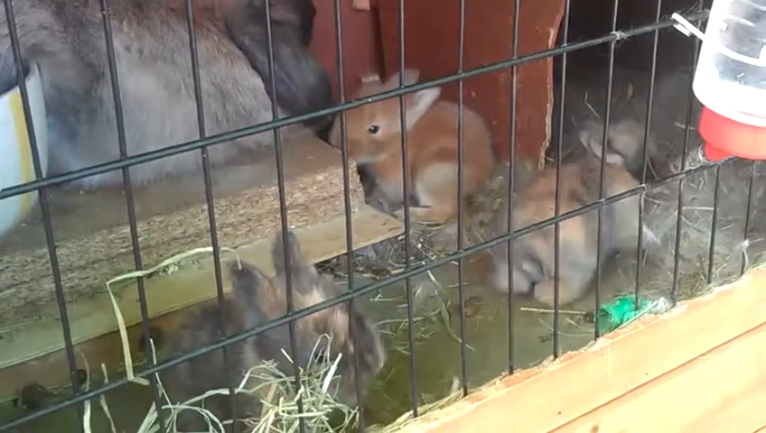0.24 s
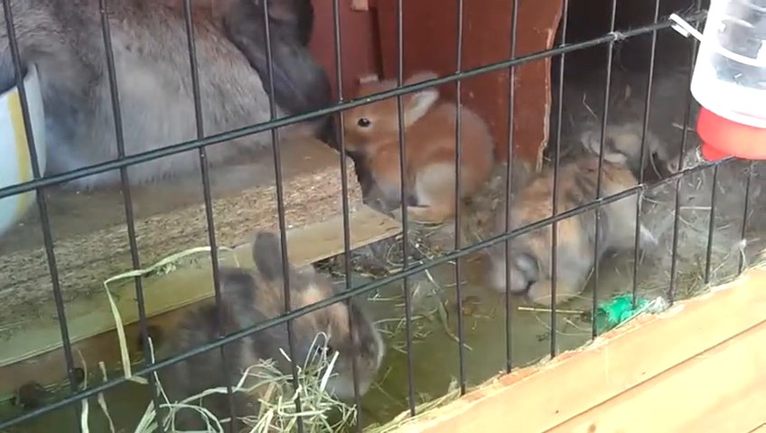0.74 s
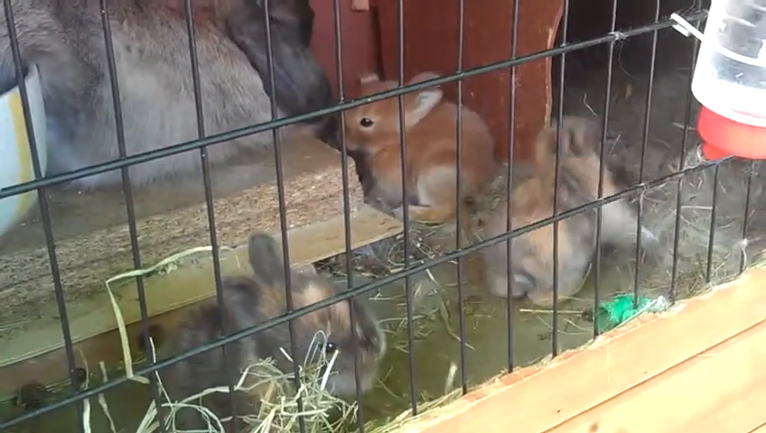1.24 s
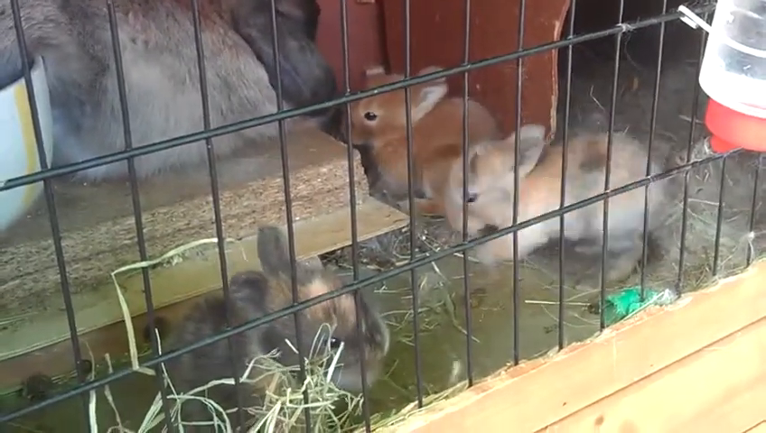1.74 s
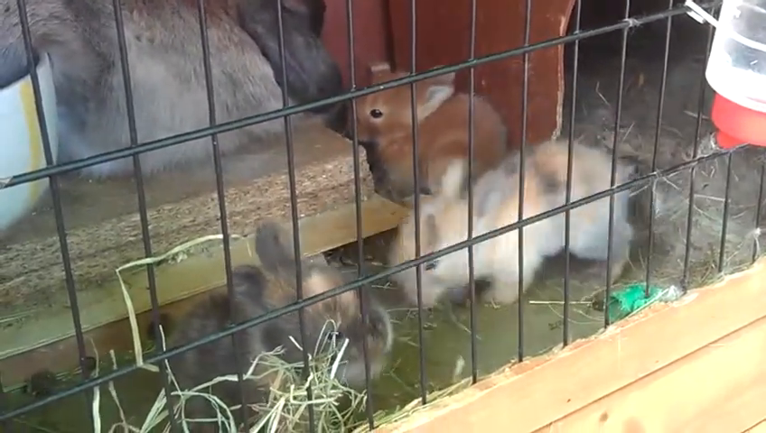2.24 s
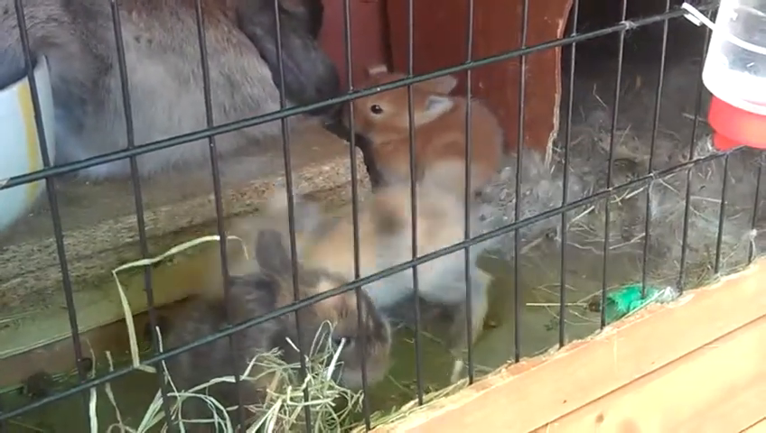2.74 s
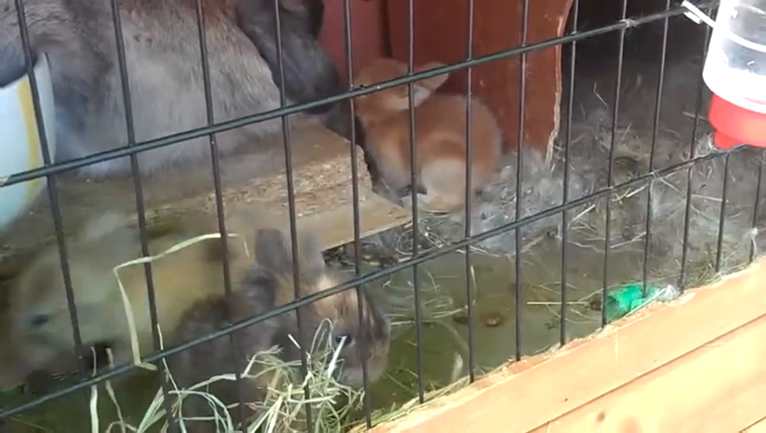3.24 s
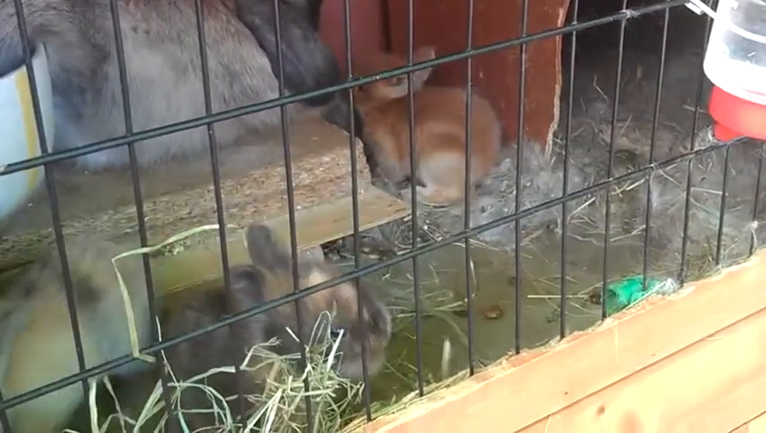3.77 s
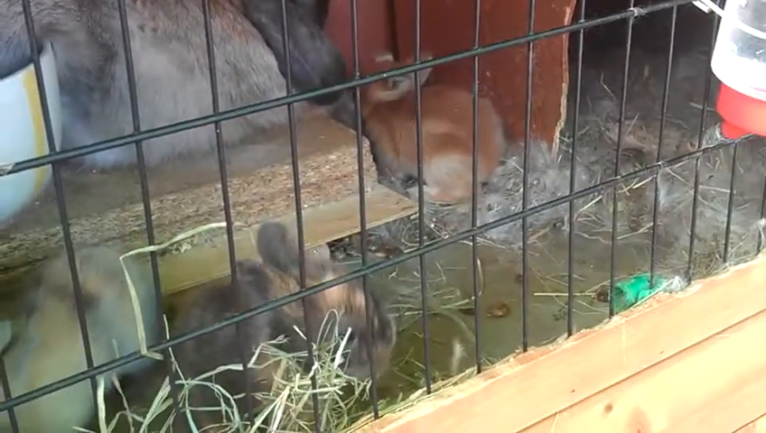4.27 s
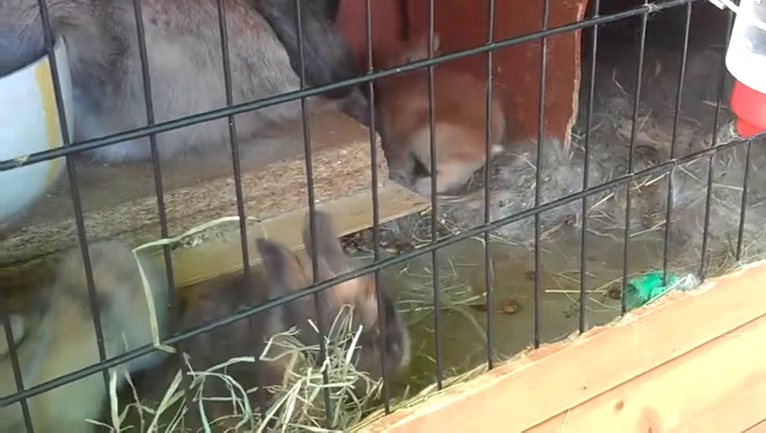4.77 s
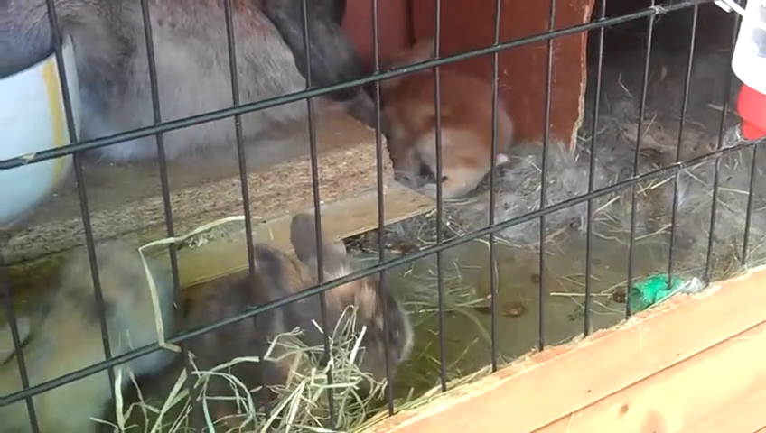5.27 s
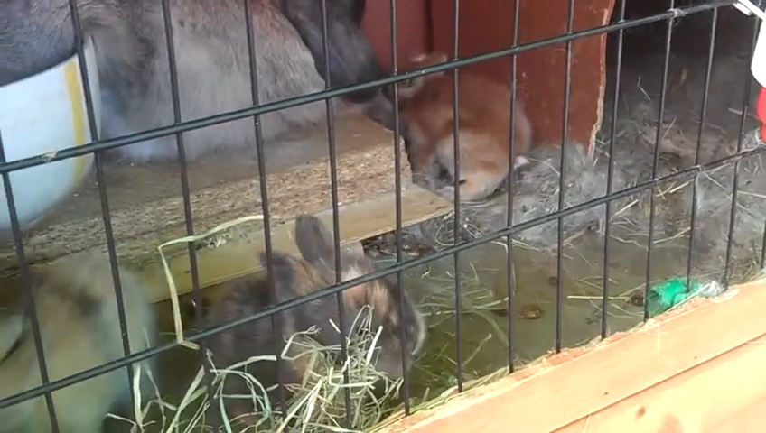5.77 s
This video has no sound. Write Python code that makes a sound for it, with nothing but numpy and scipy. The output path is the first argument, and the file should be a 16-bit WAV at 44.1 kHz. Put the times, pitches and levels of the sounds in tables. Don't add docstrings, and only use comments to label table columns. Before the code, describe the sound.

Young rabbits rustle and hop in dry hay, stems snapping, while distant sparrows chatter; near the end three loud plastic snaps crack out.

```python
import sys
import numpy as np
from scipy import signal
from scipy.fft import rfft, irfft, next_fast_len
from scipy.io import wavfile
from scipy.ndimage import uniform_filter1d

SR = 44100
rng = np.random.default_rng(int(sys.argv[2]) if len(sys.argv) > 2 else 0)


def materialize(psi):
    bounded = np.clip(np.atleast_2d(psi).T, -1, 1)
    quanta = np.round(bounded * 32767).astype(np.int16)
    wavfile.write(sys.argv[1], SR, quanta)


def makeup_ratio(level_db):
    decades = np.asarray(level_db, float) / 20
    return 10 ** decades


N = 264908

# frequency in Hz, level in dB.
CRACKLE_TONE = [(2000, -19.5), (3600, 1), (6300, -7.5), (8500, -7.5), (10500, -1), (13800, -8.5)]
# frequency in Hz, level in dB.
SCUFF_TONE = [(150, -47), (500, -12), (1200, -6), (2300, 1), (3600, 3), (5000, -8), (6500, -37)]


def evened(x):
    return x / np.sqrt(np.mean(x ** 2) + 1e-20)


def read(points, hz):
    f, value = np.transpose(points)
    return np.interp(np.log(hz + 1), np.log(f + 1), value)


def add(mix, s, sound):
    part = mix[..., round(s * SR):][..., :sound.shape[-1]]
    part += sound[..., :part.shape[-1]]


def coloured(x, points):
    size = next_fast_len(x.shape[-1])
    gain = makeup_ratio(read(points, np.fft.rfftfreq(size, 1 / SR)))
    return irfft(rfft(x, size) * gain, size)[..., :x.shape[-1]]


def highpassed(x, order, hz):
    return signal.sosfilt(signal.butter(order, hz, "high", fs=SR, output="sos"), x)


def scattered(x, t60, size, count):
    t = np.arange(size) / SR
    turn = np.arange(N) / SR * 12
    tails = rng.standard_normal((count, 2, size)) * makeup_ratio(-60 * t / t60)
    tails /= np.linalg.norm(tails, axis=2, keepdims=True)
    out = np.zeros((2, N))
    for k, tail in enumerate(tails):
        near = np.clip(1 - abs((turn - k) % count - 1), 0, 1)
        faded = x * np.sin(np.pi / 2 * near)
        out += signal.oaconvolve(faded[None], tail, axes=1)[:, :N]
    return out


def swarm(level, per_s, spread_db, t60):
    size_db = spread_db * np.minimum(rng.exponential(1, N), 4)
    power = makeup_ratio(2 * size_db) * (rng.random(N) < per_s / SR)
    puff = makeup_ratio(-120 * np.arange(1500) / SR / t60)
    shape = signal.oaconvolve(level ** 2 * power / power.mean(), puff / puff.sum())[:N]
    return np.sqrt(abs(shape)) * rng.standard_normal((2, N))


def swells(times, dbs, lengths, rise, drop_db, rest_db):
    t = np.arange(0, N + 64, 64) / SR
    u = (t - np.array(times)[:, None]) / np.maximum(lengths, .005)[:, None]
    fall_db = drop_db * np.where(u < 0, -u / rise, u)
    power = makeup_ratio(2 * (np.array(dbs)[:, None] - fall_db)).sum(0)
    return np.sqrt(np.interp(np.arange(N) / SR, t, power) + makeup_ratio(2 * rest_db))


def yard():
    # frequency in Hz, level in dB per Hz.
    yard_tone = [(24, -45), (40, -26), (75, -36.5), (169, -3), (221, 2), (617, -6.5), (807, -2),
                 (2480, -11.5), (3580, -3.5), (4920, -12.5), (7090, -20), (7820, -20), (11000, -16.5),
                 (13700, -17)]
    # frequency in Hz, left-right likeness (1 same, -1 opposite).
    likeness = [(60, -0.88), (150, 1), (360, 0.21), (890, -0.42), (2190, 0.57), (5390, 0.19), (13300, 0.23)]
    frames, hz = N // 256 + 5, np.fft.rfftfreq(1024, 1 / SR)
    a, b, c, d, patches = rng.standard_normal((frames, 513, 5)).T
    patches = uniform_filter1d(patches, 12, 0)
    patches = evened(uniform_filter1d(patches, 14, 1))
    same = np.clip(read(likeness, hz), -1, 1)[:, None]
    left, other = a + 1j * b, c + 1j * d
    z = np.array([left, same * left + np.sqrt(1 - same ** 2) * other])
    z *= makeup_ratio(read(yard_tone, hz)[:, None] + 0.91 * patches)
    noise = signal.istft(z, nperseg=1024, noverlap=768)[1][:, :N]
    return makeup_ratio(-46.5) * evened(noise)


def chatter(first_hz, last_hz, count):
    flock, u = np.zeros(N), np.linspace(0, 1, 3000)
    for when, a, b, rate in rng.random((count, 4)):
        start_hz = first_hz * (.85 + .4 * a ** 1.5)
        end_hz = last_hz * (.87 + .26 * b)
        warble = 1 + 0.048 * np.sin(2 * np.pi * (3.456 + 4.41 * rate) * u)
        hz = (start_hz * (1 - u) + end_hz * u) * warble
        add(flock, when * N / SR, np.sin(2 * np.pi * np.cumsum(hz) / SR) * np.sin(np.pi * u))
    blurred = scattered(flock, 0.45, size=9000, count=6)
    blurred[:, :4000] += blurred[:, -4000:] * np.linspace(1, 0, 4000)
    return blurred / np.sqrt(uniform_filter1d((blurred ** 2).mean(0), 3000))


def sparrows():
    # loudest moment in seconds, low chatter in dB, high opening in dB, length in seconds.
    bouts = [(.01, -47, -66.5, 0.16), (0.145, -41.5, -54, 0.27), (0.572, -46, -73, 0.21),
             (0.755, -48.5, -56, 0.16), (1.19, -43.5, -48.5, 0.21), (1.413, -47.5, -64, 0.22),
             (1.69, -41.5, -53, 0.3), (2.1, -47.5, -55, 0.45), (2.32, -38.5, -50, 0.14),
             (2.553, -43.5, -60, .12), (2.964, -40.5, -46, 0.17), (3.16, -47, -53, 0.23),
             (3.92, -43.5, -50, 0.18), (3.682, -43.5, -63, 0.17), (4.054, -36, -61, .2),
             (4.192, -53, -54, .2), (4.756, -38.5, -46, 0.26), (5.404, -48, -49.5, 0.11),
             (5.55, -43, -60, .2), (6.0, -41.5, -50.5, 0.3)]
    s, low_db, high_db, length = np.transpose(bouts)
    drop_db = 14.5
    low = swells(s, low_db, length, rise=0.59, drop_db=drop_db, rest_db=-80)
    high = swells(s - 0.33 * length, high_db, 0.88 * length, rise=0.3, drop_db=drop_db, rest_db=-67.5)
    low_birds = makeup_ratio(-0.5) * low * chatter(4050, 3200, count=300)
    return low_birds + makeup_ratio(0.5) * high * chatter(5500, 4500, count=200)


def hay():
    # loudest moment in seconds, stem crackle in dB, paw scuff in dB, length in seconds.
    shuffles = [(0.0, -63, -47.5, 0.028), (0.178, -58, -54, .15), (1.297, -57, -67, .04),
                (1.456, -46, -34.5, 0.035), (1.523, -53, -53, 0.1), (1.66, -52, -48, .08),
                (2.096, -50, -55, 0.023), (2.157, -73, -45.5, .06), (2.333, -50.5, -39, 0.06),
                (2.416, -66, -51, .06), (2.46, -57, -42.5, 0.048), (2.551, -35, -39.5, 0.058),
                (2.617, -57, -47, 0.087), (2.887, -48.5, -44.5, 0.085), (2.936, -48, -42.5, .04),
                (3.075, -62, -40.5, 0.03), (3.39, -50, -66, 0.045), (3.565, -52, -51, 0.053),
                (3.858, -55, -55, .05), (4.13, -58, -50.5, 0.056), (4.632, -66, -51.5, 0.079),
                (5.197, -63, -58, 0.071), (5.31, -56, -65, 0.044), (5.524, -59, -53, 0.06),
                (5.734, -59, -55, 0.054), (5.78, -67, -48, 0.13), (5.993, -53, -44, 0.13)]
    # time in seconds, level in dB.
    nibbling = [(0, -58), (.3, -73), (1.0, -71), (1.4, -60.5), (3.0, -60.5), (3.7, -57.5), (4.6, -59),
                (5.1, -60), (6.0, -59.5)]
    s, crackle_db, scuff_db, length = np.transpose(shuffles)
    nibble_db = np.interp(np.arange(N) / SR, *np.transpose(nibbling))
    rise, drop_db = 0.73, 16
    crackle = swells(s, crackle_db, length, rise, drop_db, nibble_db)
    scuff = swells(s, scuff_db, length, rise, drop_db, nibble_db + 1.5)
    crackle = swarm(crackle, per_s=1000, spread_db=3.6, t60=.016)
    scuff = swarm(scuff, per_s=450, spread_db=3.8, t60=.016)
    return makeup_ratio(11.0) * coloured(crackle, CRACKLE_TONE) + makeup_ratio(9.5) * coloured(scuff, SCUFF_TONE)


def stems():
    # start in seconds, peak in dB, dull body against the crack in dB, length in seconds.
    breaks = [(0.0612, -35, -19, 0.0066), (0.576, -34.5, -18, 0.0038), (1.287, -36, -18, 0.006),
              (1.3692, -33, -10, 0.006), (1.4516, -29.5, -3.5, 0.01), (1.4604, -31.5, 1, 0.0093),
              (1.5268, -41, -11, 0.006), (1.6131, -36, -16, 0.0072), (2.092, -42.5, 5, 0.0078),
              (2.2941, -35, 8, 0.0048), (2.412, -43, -2, 0.0067), (2.449, -33, -8, 0.006),
              (2.5201, -30, -10, 0.01), (2.545, -25.5, -28, 0.0091), (2.6977, -35.5, -20, 0.006),
              (2.8638, -38, -11, 0.0074), (2.942, -36, -3, 0.0066), (3.1725, -40, 0.5, 0.0064),
              (3.264, -36.5, -14, 0.006), (3.3906, -34, -8, 0.0056), (3.4175, -36, -19, 0.006),
              (3.56, -37, -0.5, 0.0074), (3.714, -38, -1.5, 0.0064), (3.8716, -24.5, -15, 0.0042),
              (4.598, -56, -4, 0.006), (5.9872, -39, 2, 0.006)]
    sharp_cracks = [
        (2.2958, -34, 2, .002),
        (3.873, -26, -5, 0.0019),
        (5.8777, -26.5, -14, 0.016),
    ]
    # start in seconds, peak in dB, length in seconds.
    strokes = [(2.142, -31.5, 0.004), (2.316, -31, 0.0044), (2.34, -31, 0.004), (2.35, -35, 0.004),
               (2.39, -30, 0.0038), (2.4199, -34, 0.0048), (2.473, -38, 0.004), (2.579, -30, 0.006),
               (2.629, -36, 0.0046), (2.87, -40, 0.004), (2.919, -33, 0.0061), (2.973, -42, 0.0037),
               (3.067, -33, 0.004), (4.603, -32, 0.0028), (5.741, -37, 0.004), (5.766, -40, 0.004)]
    rows = [*breaks, *sharp_cracks]
    rows += [(s, db - 40, 37.5, length) for s, db, length in strokes]
    crack, body, t = np.zeros((2, N)), np.zeros((2, N)), np.arange(1500) / SR
    for s, db, body_db, length in rows:
        bright, dull = rng.standard_normal((2, 2, 1500))
        rise = 1 - np.exp(-t / .0004)
        shape = makeup_ratio(db - 5) * rise * np.exp(-t / max(length, .0005))
        add(crack, s, shape * bright)
        add(body, s, makeup_ratio(body_db) * shape * dull)
    return makeup_ratio(7.0) * coloured(crack, CRACKLE_TONE) + makeup_ratio(13.5) * coloured(body, SCUFF_TONE)


def lens_motor():
    # start in seconds, peak in dB, pulse rate in Hz, length in seconds.
    motor_steps = [
        (0.065, -38.5, 215.4, 0.02),
        (.624, -40.5, 213, 0.0254),
    ]
    out = np.zeros((2, N))
    for s, db, hz, length in motor_steps:
        t = np.arange(0, length, 1 / SR)
        buzz = sum(np.sin(2 * np.pi * k * hz * t) / k ** .8 for k in range(1, 5))
        add(out, s, makeup_ratio([[db], [db - 14.0]]) * buzz * signal.windows.tukey(len(t), .4))
    return out


def fingertip():
    # level in dB, first Hz, last Hz, glide in seconds, decay in seconds, right port against left in dB.
    finger_bump = (-23, 1900, 150, .0011, .008, -11)
    db, first_hz, last_hz, glide, decay, right_db = finger_bump
    out, t = np.zeros((2, N)), np.arange(1500) / SR
    hz = last_hz + (first_hz - last_hz) * np.exp(-t / glide)
    shape = (1 - np.exp(-t / 0.00096)) * np.exp(-(t / decay) ** 2)
    push = np.sin(2 * np.pi * np.cumsum(hz) / SR) * shape
    add(out, .9548, makeup_ratio([[db], [db + right_db]]) * push)
    return out


def paws():
    # start in seconds, peak in dB, pitch in Hz, time to fade by 60 dB in seconds.
    landings = [
        (2.145, -37.5, 830, 0.086),
        (3.066, -25.5, 300, 0.044),
        (3.084, -29, 286, 0.094),
        (1.675, -44.5, 1050, .12),
        (3.4, -52, 1020, 0.37),
        (4.609, -40, 1520, 0.072),
        (5.742, -41, 290, 0.093),
        (5.769, -36, 210, 0.084),
        (5.964, -37.5, 1480, 0.093),
        (4.6018, -32.5, 3300, 0.025),
    ]
    out, t = np.zeros((2, N)), np.arange(3000) / SR
    for s, db, hz, t60 in landings:
        ring = 0
        for k, turn in zip((1, 1.45, 2.6), rng.random((3, 2, 1))):
            ring = ring + np.sin(2 * np.pi * (hz * k * t + 0.35 * turn)) / k ** 1.7
        rise = 1 - np.exp(-t * hz / 0.68)
        add(out, s, makeup_ratio(db - 2.5 - 60 * t / t60) * rise * ring)
    return highpassed(out, 2, 180)


def snaps():
    # start in seconds, level in dB, treble in dB, bass in dB, ring in seconds.
    slips = [
        (4.967, -9.5, -15.5, -17, .00052),
        (4.9687, -25.5, -16, -18, 0.00045),
        (5.4447, -5, 4, -16.5, 0.00031),
        (5.4452, -1, -2, -15, 0.00099),
        (5.448, -15, -2, -22, 0.00071),
        (5.8745, -10.5, 6.5, -15, .0004),
        (5.875, -23, 5, -5.5, 0.00081),
    ]
    # pitch in Hz, level in dB.
    case_bass = [(480, -4), (780, -10), (1030, -0.5), (1500, -8)]
    case_mid = [(3120, 2), (3800, -3)]
    case_sharp = [(2060, -6), (4580, -7)]
    case_treble = [(5800, -0.5), (7700, 5.5), (8800, 0.5), (10400, 0.5), (12200, -4)]
    # pitch in Hz, level in dB, time to fade by 60 dB in seconds.
    ringing_on = [(760, -26, 0.018), (3190, -24, 0.03), (8630, -11, 0.016)]
    # time in seconds, left against right in dB.
    hand_place = [
        (4.97, -11),
        (5.45, -5),
        (5.88, -1.5),
    ]
    # delay in seconds, level in dB.
    wall_echoes = [(0.0086, -30), (.0185, -60), (.026, -60)]
    out, t = np.zeros((2, N)), np.arange(1500) / SR
    for s, db, treble_db, bass_db, ring in slips:
        modes = [(f, d + bass_db, 1.7) for f, d in case_bass]
        modes += [(f, d, 1) for f, d in case_mid]
        modes += [(f, d + 16 * np.log(ring / 0.00092), .9) for f, d in case_sharp]
        modes += [(f, d + treble_db, .6) for f, d in case_treble]
        sound = 0
        for f, d, t60 in ringing_on:
            fade_db = d + min(treble_db, 0) * (f > 5000) - 60 * t / t60
            sound = sound + makeup_ratio(fade_db) * np.sin(2 * np.pi * f * t) * np.minimum(t / ring, 1)
        for (f, d, slow), turn in zip(modes, rng.random((len(modes), 2, 1))):
            u = t / (ring * slow)
            wave = np.sin(2 * np.pi * f * (t - ring + 0.0001114 * turn))
            sound = sound + makeup_ratio(d) * wave * u ** 2 * np.exp(2 - 2 * u)
        pan_db = np.interp(s, *np.transpose(hand_place))
        add(out, s, makeup_ratio([[db + pan_db / 2], [db - pan_db / 2]]) * sound)
    echoes = np.zeros((2, 2000))
    for delay, db in wall_echoes:
        smear = rng.standard_normal((2, 400)) * np.exp(-np.arange(400) / 40)
        add(echoes, delay, makeup_ratio(db - 32.0) * smear)
    out = out + signal.oaconvolve(out, echoes, axes=1)[:, :N]
    return highpassed(out, 2, 300)


def scene():
    outdoors = yard() + sparrows()
    hutch = hay() + stems() + paws()
    return outdoors + hutch + lens_motor() + fingertip() + snaps()


def gated(x):
    # frequency in Hz, level in dB.
    mute_below = [(3500, -9), (5000, -3.6), (6000, -2.7), (7200, -2.3), (8800, -2.6), (9800, -4.5),
                  (12000, -4.2), (13500, -3.2)]
    hz, _, z = signal.stft(x, SR, nperseg=1024, noverlap=768)
    power = uniform_filter1d((abs(z) ** 2).mean(0), size=3, axis=0)
    level_db = 10 * np.log10(uniform_filter1d(power, size=9, axis=1) + 1e-20)
    near_db = uniform_filter1d(level_db, size=11, axis=0)
    near_db = uniform_filter1d(near_db, size=16, axis=1)
    usual_db = np.minimum(near_db, np.median(near_db, axis=1, keepdims=True))
    faint = level_db < usual_db + read(mute_below, hz)[:, None] + 1.3
    quieted = z * np.where(faint, makeup_ratio(-25.), 1)
    return signal.istft(quieted, SR, nperseg=1024, noverlap=768)[1][:, :N]


def low_pass(x):
    return signal.sosfilt(signal.butter(12, 13860, fs=SR, output="sos"), x)


def record(dry):
    # frequency in Hz, left against right in dB.
    port_difference = [(60, -10), (110, 5.5), (200, 3), (360, 0), (660, 2.5), (1200, 1), (2190, 0.5),
                       (4000, -3), (7280, 0.5), (13300, 10.5)]
    left_tone = [(hz, db / 2) for hz, db in port_difference]
    right_tone = [(hz, -db / 2) for hz, db in port_difference]
    ports = np.array([coloured(dry[0], left_tone), coloured(dry[1], right_tone)])
    blocked = highpassed(np.clip(ports, -1, 1), 1, 85)
    mix = np.clip(gated(blocked), -1, 1)
    return low_pass(mix)


dry = scene()
out = record(dry)
materialize(out)
```